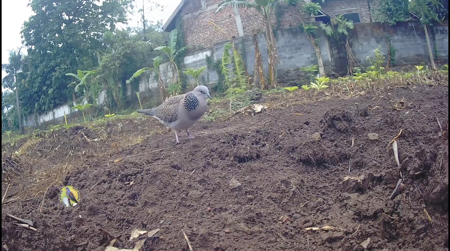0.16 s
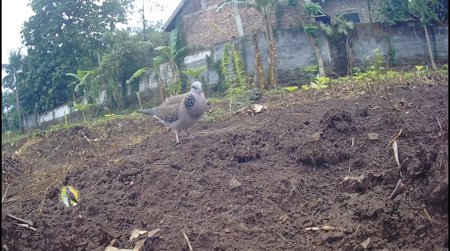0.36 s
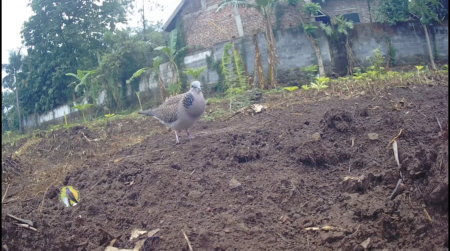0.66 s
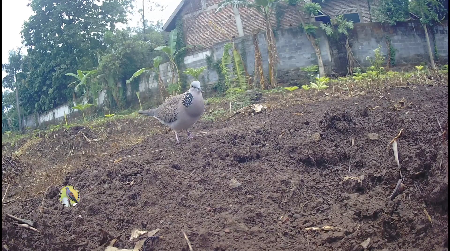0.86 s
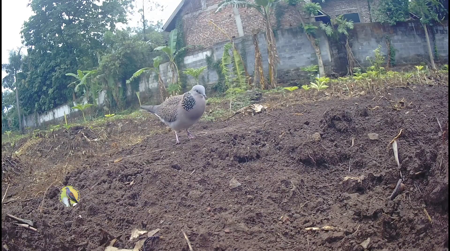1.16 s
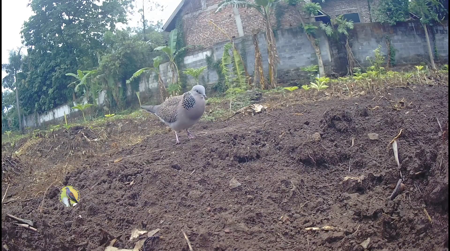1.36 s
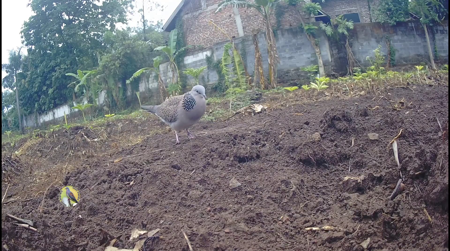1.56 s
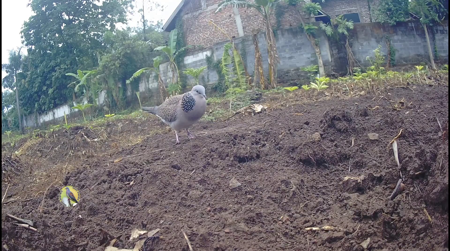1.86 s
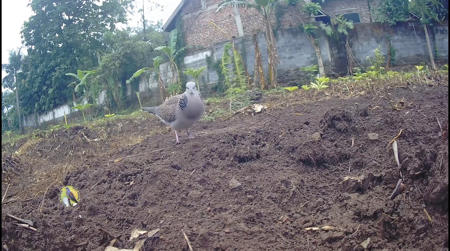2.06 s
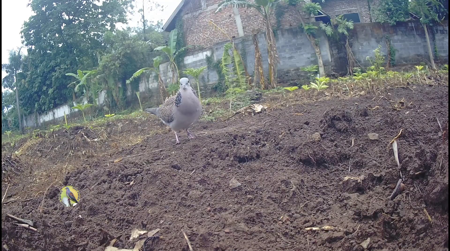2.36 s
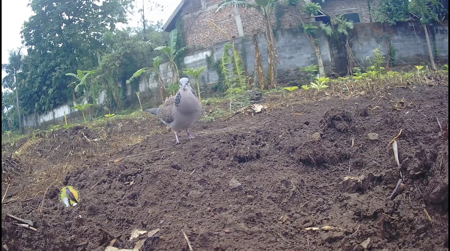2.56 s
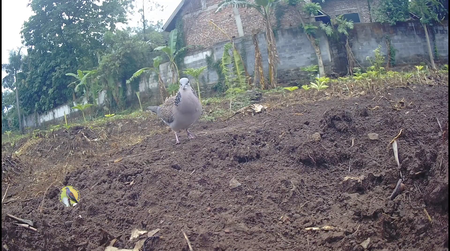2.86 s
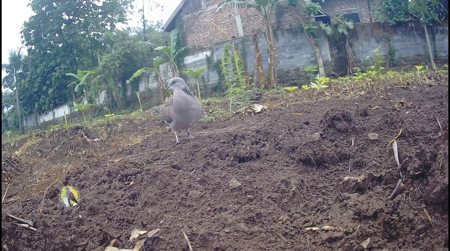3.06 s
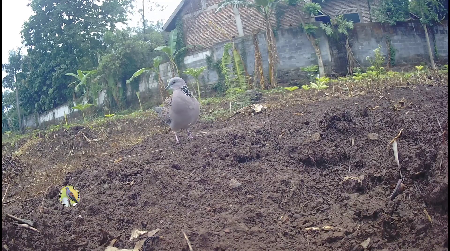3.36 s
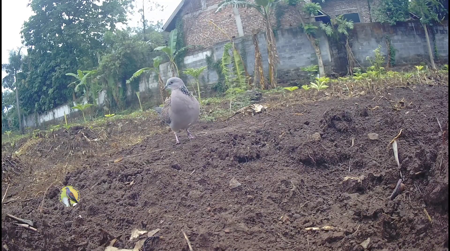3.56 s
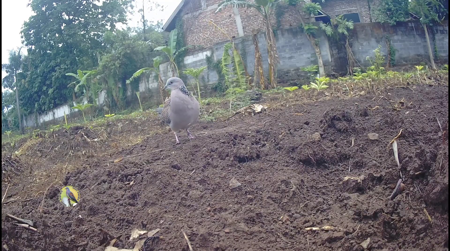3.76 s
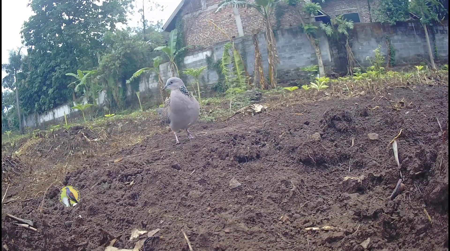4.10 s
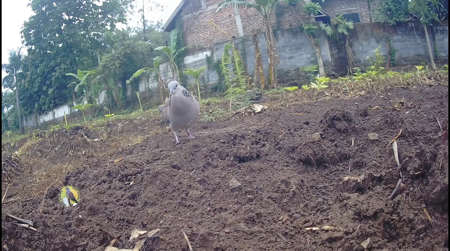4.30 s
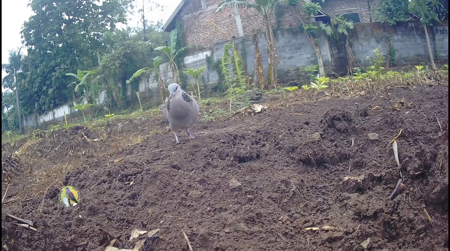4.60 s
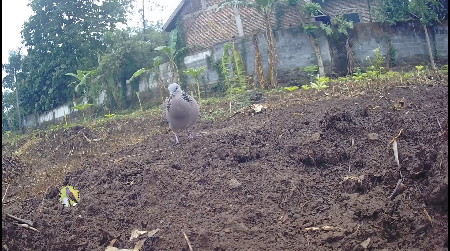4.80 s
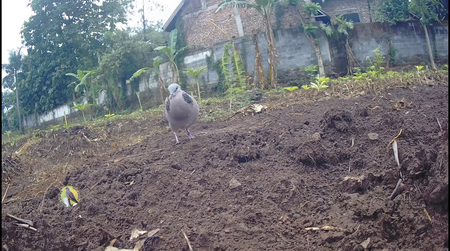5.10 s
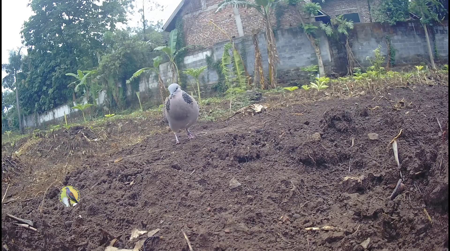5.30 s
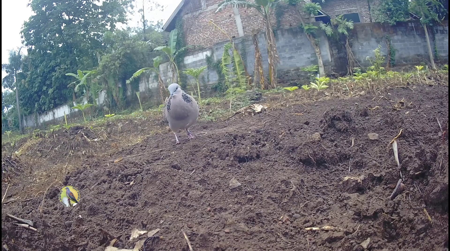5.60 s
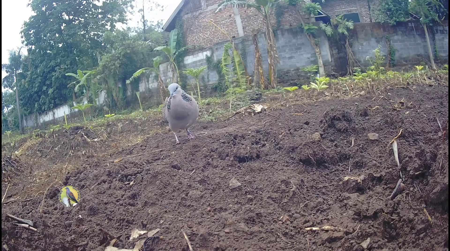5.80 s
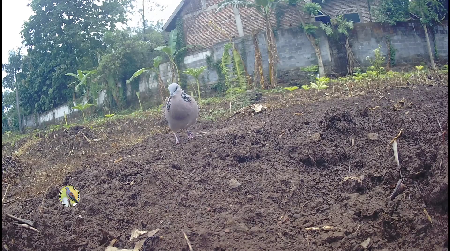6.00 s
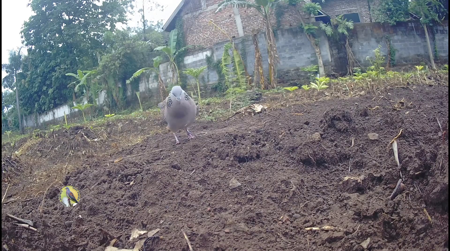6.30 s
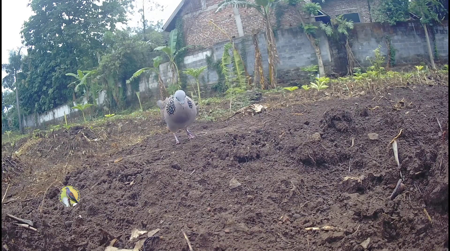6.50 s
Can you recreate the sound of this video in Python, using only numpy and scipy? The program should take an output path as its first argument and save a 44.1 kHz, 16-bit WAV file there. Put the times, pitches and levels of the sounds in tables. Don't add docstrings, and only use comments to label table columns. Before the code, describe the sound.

A dove close by coos in throaty, throbbing purrs, twice in full and once cut short, over low traffic and motor hum outdoors.

```python
import sys
import numpy as np
from scipy import signal
from scipy.fft import rfft, irfft
from scipy.io import wavfile
from scipy.ndimage import uniform_filter1d, minimum_filter1d

SR = 44100
rng = np.random.default_rng(int(sys.argv[2]) if len(sys.argv) > 2 else 0)


def put_to_file(sound):
    columns = np.atleast_2d(sound).T
    safe = np.clip(columns, -1, 1)
    whole_steps = np.round(safe * 32767)
    wavfile.write(sys.argv[1], SR, whole_steps.astype(np.int16))


def invert_db(level):
    return 10 ** (np.asarray(level, dtype=float) / 20)


N = 293265
T = np.arange(N) / SR

TIGHTEN_S = .0115
STRAY_PUFF_S, STRAY_PUFF_DB = .0043, -8.5
HUSH_DB = -90
# [t/s, top f/Hz, level/dB]
CROONS = [
    [(1.429, 635, -0.9), (1.453, 754.5, 1.2), (1.49, 830.5, 6.5), (1.55, 839.6, 7), (1.6, 781.7, 6),
     (1.65, 752.6, 3), (1.75, 680, 6.5), (1.866, 594.7, -1), (1.886, 539.5, -25)],
    [(4.736, 635, 0.7), (4.759, 772.6, 3.5), (4.8, 830.6, 5.5), (4.885, 836, 7.5), (4.91, 766, 6.5),
     (4.97, 789.5, 7.5), (5.05, 712, 6.5), (5.19, 568, -6.5), (5.21, 530, -15.5)],
]


def rms_one(x):
    return x / np.sqrt(np.mean(x ** 2) + 1e-20)


def at_hz(points, hz):
    table_hz, value = np.array(points).T[:2]
    return np.interp(np.log(hz), np.log(table_hz), value)


def one_pole(x, seconds):
    r = np.exp(-1 / (seconds * SR))
    return signal.lfilter([1 - r], [1, -r], x)


def soften(x, size):
    return uniform_filter1d(uniform_filter1d(x, size=size), size=size)


def drift(rate):
    r = np.exp(-80 * np.pi * rate / SR)
    noise = rng.standard_normal(N // 40 + 2002)
    slow = signal.lfilter([1], [1, -2 * r, r * r], noise)[2000:]
    return np.interp(np.arange(N) / 40, np.arange(len(slow)), rms_one(slow))


def resonance(x, hz, width_hz):
    r = np.exp(-np.pi * width_hz / SR)
    bottom = [1, -2 * r * np.cos(2 * np.pi * hz / SR), r * r]
    return signal.lfilter(np.array([1, 0, -1]) * (1 - r * r) / 2, bottom, x)


def ringing_noise(hz, width_hz):
    once = resonance(rng.standard_normal(N), hz, width_hz)
    return rms_one(resonance(once, hz, width_hz))


def tone_phase(hz):
    return 2 * np.pi * np.cumsum(hz) / SR


def placed(x, left_db):
    return x * invert_db(np.array([[left_db / 2], [-left_db / 2]]))


def short_notes():
    # [start t/s, held for/s, top f/Hz, sag after the top/(Hz/s), tail fall/(dB/s)]
    kuks = [
        (.986, .051, 725, 3600, 420),
        (4.252, .047, 700, 5000, 480),
        (6.316, .066, 718, 1500, 4000),
    ]
    # [first t/s, gap/s, level/dB, valve closure in the tail before/dB]
    mutters = [
        (1.0922, .0146, -8, 4),
        (4.3293, .0152, -11, 3),
        (6.4184, .0143, -7, 25),
    ]
    # [first full throb t/s, held from t/s, end t/s, level/dB]
    rolls = [
        (1.1732, 1.238, 1.288, 6.5),
        (4.458, 4.532, 4.586, 9.5),
        (6.4995, 6.5855, 6.638, 6.5),
    ]
    kuk_start_hz, kuk_top_s, kuk_swell_db, kuk_held_db = 523.7, .032, -4.5, 2
    mutter_hz, puff_fall_db, last_puff_db, tail_gap_s = 641, 109, 5, .0145
    roll_start_hz, roll_first_hz, roll_held_hz, roll_end_hz = 572.3, 654.5, 723, 620
    effort, beats = [], []
    for kuk, mutter, roll in zip(kuks, mutters, rolls):
        s, held, top, sag, tail = kuk
        puff, gap, puff_db, flutter_db = mutter
        full, hold, end, db = roll
        rise = top - kuk_start_hz
        low_db = puff_db - 5
        lead = full - .012
        faded = min(s + held + (kuk_held_db - low_db) / tail, puff)
        faded_hz = max(top - sag * (faded - s - kuk_top_s), 480)
        effort += [(s, top, HUSH_DB), (s, kuk_start_hz, -10.5),
                   (s + kuk_top_s / 3, top - .47 * rise, kuk_swell_db),
                   (s + .7 * kuk_top_s, top - .15 * rise, kuk_swell_db + 2.5),
                   (s + kuk_top_s, top, kuk_held_db - 2),
                   (s + held, top - sag * (held - kuk_top_s), kuk_held_db),
                   (faded, faded_hz, low_db)]
        effort += [(puff - gap / 2, 590, low_db), (puff, 600, low_db - 7.5),
                   (puff, mutter_hz, puff_db), (lead - 2 * gap, mutter_hz, puff_db - 8),
                   (lead - gap, mutter_hz, puff_db + last_puff_db),
                   (lead, mutter_hz, puff_db + last_puff_db)]
        effort += [(lead, roll_start_hz, -6), (full + TIGHTEN_S / 2, roll_first_hz, -2.7),
                   (hold, roll_held_hz, db), ((hold + end) / 2, roll_held_hz - 6, db),
                   (end - .008, roll_held_hz - 45, db), (end, roll_end_hz, db),
                   (end, roll_end_hz, db + STRAY_PUFF_DB),
                   (end + STRAY_PUFF_S, roll_end_hz, db + 2 * STRAY_PUFF_DB),
                   (end + STRAY_PUFF_S, roll_end_hz, HUSH_DB)]
        beats.append((s, 4, 0))
        for j, b in enumerate(np.arange(s + held, puff - gap / 2, tail_gap_s)):
            beats.append((b, min(flutter_db * (1 + 2 * j), 30), 0))
        beats += [(b, 30, puff_fall_db) for b in np.arange(puff, lead - gap / 2, gap)]
        beats.append((lead, 24, 0))
        throbs = round((hold - full) / .0125) + 1
        beats += [(b, 15.5, 0) for b in np.linspace(full, hold, throbs)]
        beats.append((end, 30, 0))
    return effort, beats


def long_notes():
    # [from t/s, number of throbs, closure/dB]
    first_beats = [(1.429, 1, 18), (1.4457, 3, 27), (1.5016, 1, 30), (1.5163, 5, 26), (1.5831, 3, 18),
                   (1.6273, 2, 9), (1.6514, 1, 4), (1.6906, 1, 9), (1.7164, 3, 19), (1.7662, 1, 16),
                   (1.789, 4, 11), (1.8569, 1, 11)]
    # [from t/s, number of throbs, closure/dB]
    second_beats = [(4.736, 1, 18), (4.7512, 3, 21), (4.8095, 4, 27), (4.8732, 2, 17), (4.9009, 3, 26),
                    (4.9359, 3, 26), (4.9768, 2, 30), (5.0017, 1, 6), (5.0263, 1, 9), (5.0632, 3, 14),
                    (5.1094, 1, 14), (5.1341, 3, 11), (5.1861, 1, 6)]
    effort, beats = [], []
    for curve, runs in zip(CROONS, (first_beats, second_beats)):
        s, hz, db = curve[0]
        last_s, last_hz = curve[-1][:2]
        effort += [(s - STRAY_PUFF_S, hz, HUSH_DB), (s - STRAY_PUFF_S, hz, db + 2 * STRAY_PUFF_DB),
                   (s, hz, db + STRAY_PUFF_DB), *curve, (last_s, last_hz, HUSH_DB)]
        ends = [run[0] for run in runs[1:]] + [last_s]
        for (start, throbs, closure_db), run_end in zip(runs, ends):
            for b in np.linspace(start, run_end, round(throbs), endpoint=False):
                fall_db = 7 * (b == runs[0][0])
                beats.append((b, closure_db, fall_db))
        beats.append((last_s, 30, 0))
    return effort, beats


def phrases():
    short_effort, short_beats = short_notes()
    long_effort, long_beats = long_notes()
    effort = sorted(short_effort + long_effort, key=lambda row: row[0])
    return effort, sorted([(0, 0, 0), *short_beats, *long_beats, (N / SR, 0, 0)])


def dove():
    # [multiple of the pitch, level/dB]
    overtone_levels = [
        (2, -55),
        (3, -59),
    ]
    open_s, puff_open_s, shut_s = .0038, .0025, .0026
    effort, beats = phrases()
    s, taut_hz, level_db = np.transpose(effort)
    taut, level_db = np.interp(T, s, taut_hz), np.interp(T, s, level_db)
    crooning = sum((T > c[0][0]) * (T < c[-1][0]) for c in CROONS)

    start, closure_db, fall_db = np.transpose(beats)
    k = np.searchsorted(start, T, side="right") - 1
    since, until = T - start[k], start[k + 1] - T
    is_puff = fall_db > 20
    opening_s = np.where(is_puff[k], puff_open_s, open_s)
    opening = 1 - (1 - invert_db(-closure_db[k])) * np.exp(-(since / opening_s) ** 2)
    closing = 1 - (1 - invert_db(-closure_db[k + 1])) * np.exp(-(until / shut_s) ** 2)

    dip_hz = np.maximum(taut - 577.4, np.where(crooning, 70.5, 111.46))
    shut = np.minimum(closure_db / 11.5, 1)
    tightening = np.clip(1 - since / TIGHTEN_S, 0, 1)
    easing = .53 * np.clip(since / TIGHTEN_S - 1, 0, 1) ** .5 * np.exp(-until / .005)
    slack = shut[k] * tightening + shut[k + 1] * easing
    scatter_hz = is_puff * rng.normal(0, 45, len(start))
    pitch = soften(np.minimum(taut - dip_hz * slack + scatter_hz[k], 830), size=70)

    unevenness_db = rng.normal(0, .4, len(start))
    crop_db = -3.3 * (np.maximum(pitch - 650, 0) / 100) ** 2
    dying_db = fall_db[k] * (since / (since + until)) ** 2
    flow_db = level_db + unevenness_db[k] + crop_db - dying_db
    flow = soften(invert_db(flow_db) * opening * closing, size=50)
    coo = invert_db(.9) * flow * np.sin(tone_phase(pitch))
    breath = invert_db(-29.5) * np.sqrt(flow) * rms_one(resonance(rng.standard_normal(N), 700, 600))

    top = -minimum_filter1d(-pitch, size=900)
    tension = top / 750
    buzz = soften(flow * invert_db(-crop_db), size=120) * invert_db(2.5 * drift(30.0) + 5 * crooning)
    buzz = buzz * (pitch / top) ** 8 * tension ** 2
    settled = tone_phase(soften(.1 * pitch + .9 * top - 8, size=500))
    overtones = buzz * sum(invert_db(db) * np.sin(m * settled) for m, db in overtone_levels)
    whistle = np.sin(tone_phase(5580 + 50 * drift(60.0)))
    beak = invert_db(-72) * crooning * buzz * tension ** 6 * whistle

    snap_level = soften(invert_db(-47 + level_db) * shut[k] * np.exp(-since / .002), size=40)
    snap = snap_level * ringing_noise(1300, 900)
    crop = signal.butter(4, 1050, fs=SR, output="sos")
    return signal.sosfiltfilt(crop, coo + breath) + overtones + beak + snap


def garden_echo(x, t60):
    t = np.arange(int(.2 * SR)) / SR
    tail = rng.standard_normal((2, len(t))) * invert_db(-60 * t / t60) * (t > .004)
    return signal.fftconvolve(x[None], tail / np.sqrt(np.sum(tail[0] ** 2)), axes=1)[:, :N]


def chick():
    # [start t/s, length/s, top f/Hz, end f/Hz, level/dB]
    peeps = [
        (.42, .1, 1645, 1580, -65),
        (1.92, .14, 1610, 1470, -63),
        (3.17, .135, 1610, 1430, -63),
        (5.27, .07, 1590, 1540, -77),
    ]
    out = np.zeros(N)
    for start, length, top_hz, end_hz, db in peeps:
        first = int(start * SR)
        u = np.arange(int(length * SR)) / (length * SR)
        sag_hz = (top_hz - end_hz) * u ** 1.6
        wobble_hz = 12 * np.sin(2 * np.pi * 45 * length * u)
        phase = tone_phase(top_hz - sag_hz - 130 * np.exp(-u / .039) + wobble_hz)
        tone = .8 * np.sin(2 * phase) + np.sin(3 * phase) + .2 * np.sin(4 * phase)
        flutter = invert_db(-.5 + 3 * drift(40.0)[first:][:len(u)])
        out[first:][:len(u)] += invert_db(db) * np.sqrt(np.sin(np.pi * u)) * tone * flutter
    return out


def crickets():
    # [start t/s, end t/s, level/dB]
    rasp_times = [
        (.79, 1.27, -72),
        (2.07, 2.55, -72),
        (3.3, 3.83, -72),
        (4.63, 5.1, -71),
        (5.82, 6.33, -72),
    ]
    phrase_level = 0
    for start, end, db in rasp_times:
        fade = np.minimum((T - start) / .065, (end - T) / .015)
        phrase_level = phrase_level + invert_db(db) * np.clip(fade, 0, 1)
    strokes = np.maximum(np.sin(tone_phase(80 + 6 * drift(4.4))) + .3, 0)
    wings = strokes * resonance(rng.standard_normal((2, N)), 7540, 260)
    rasp = phrase_level * rms_one(resonance(wings, 7540, 330))
    trill = invert_db(-70) * ringing_noise(3168, 70)
    return rasp + placed(trill, -1.6)


def camera_ticks():
    # [f/Hz, level/dB, time to fall by 60 dB/s]
    shell_rings = [
        (1780, -48, .014),
        (4850, -56, .008),
        (2400, -58, .005),
    ]
    per_s = 25
    at = np.arange(.012, N / SR, 1 / per_s)
    harder = np.arange(len(at)) % per_s == 7
    strength_db = rng.normal(0, 2.5, (len(at), 3)) + [9, 2, 0] * harder[:, None]
    out = np.zeros(N)
    for (hz, db, t60), each_db in zip(shell_rings, strength_db.T):
        clicks = np.zeros(N) + 1e-18
        clicks[(at * SR).astype(int)] = invert_db(db + each_db)
        r, w = invert_db(-60 / (t60 * SR)), 2 * np.pi * hz / SR
        out += signal.lfilter([0, np.sin(w)], [1, -2 * r * np.cos(w), r * r], clicks)
    return out


def motor(swell_db):
    # [f/Hz, level/dB, width/Hz, loud from t/s, loud to t/s]
    hum_lines = [
        (71.5, -37, 6.8, -3, 16),
        (163, -36.5, 8.9, 1, 3.18),
        (162.96, -34, 3.3, 3.5, 5.7),
        (204, -37.5, 1.8, 4, 7),
        (265.2, -32.5, 18, 1, 3.1),
        (282.1, -36, 2.9, 3, 3.4),
        (249.8, -37.5, 9, -8, 2.7),
        (424, -55.5, 12, 4, 8.3),
    ]
    out = 0
    for hz, db, width_hz, start, end in hum_lines:
        loud = np.clip(np.minimum(T - start, end - T) / .082 + 1, .25, 1)
        out = out + invert_db(db) * loud * ringing_noise(hz, width_hz)
    return invert_db(swell_db) * out


def air(swell_db):
    # [f/Hz, level per Hz/dB]
    air_levels = [(22, -28), (60, 2), (165, -2), (270, -9.5), (450, -10.5), (560, -16), (830, -17),
                  (1000, -26), (1240, -33.5), (2000, -35.5), (3140, -41), (3900, -46.5), (10000, -50),
                  (15000, -58.5)]
    # [f/Hz, likeness from -1 to 1]
    side_likeness = [(60, 1), (300, 1), (630, .97), (1000, .68), (1370, .58), (3010, .56), (6580, .11),
                     (14400, -.08)]
    # [f/Hz, difference/dB]
    left_lead = [(60, -3.0), (150, -3.5), (370, -2.5), (930, 0), (2320, -2), (5780, 0), (14400, -0.5)]
    out, edges = 0, 22 * 2 ** np.arange(0, 9.7, 1 / 3)
    white = rng.standard_normal((2, 2, N))
    for k, (low, high) in enumerate(zip(edges, edges[1:])):
        band = signal.butter(2, [low, high], "band", fs=SR, output="sos")
        mid, side = signal.sosfilt(band, white[k % 2])
        hz = np.sqrt(low * high)
        alike = np.clip(at_hz(side_likeness, hz), -1, 1)
        bass = 1 / (1 + (hz / 350) ** 2)
        gain = invert_db(at_hz(air_levels, hz) + bass * swell_db)
        pair = np.sqrt(1 + alike) * mid + np.sqrt(1 - alike) * side * [[1], [-1]]
        out = out + gain * placed(pair, at_hz(left_lead, hz))
    return invert_db(-27) * out / np.std(out[:, N // 3:N // 2])


def scene():
    # [t/s, traffic/dB, motor/dB]
    rumble = [
        (0.0, 5.5, -6.5),
        (6.65, 4, -1.5),
    ]
    s, traffic_points, motor_points = np.transpose(rumble)
    traffic_db, motor_db = np.interp(T, s, traffic_points), np.interp(T, s, motor_points)
    coo = dove()
    late_coo = np.interp(T - 1.5e-5, T, coo)
    bird = placed(np.array([late_coo, coo]), -1.7) + invert_db(-24) * garden_echo(coo, t60=.07)
    hum = air(traffic_db) + placed(motor(motor_db), -2.5)
    peeping = chick() * np.array([[.75], [1.2]])
    return bird + hum + crickets() + peeping + placed(camera_ticks(), -.5)


def top_dropouts(x, cut_db):
    # [lower edge f/Hz, margin to stay on]
    top_bands = [
        (11300, 2.6),
        (12700, 1.9),
        (13600, .9),
        (14300, -.2),
        (15100, 0),
    ]
    spectrum, hz, chance = rfft(x), np.arange(N // 2 + 1) * SR / N, drift(12.0)
    out = irfft(spectrum * (hz < top_bands[0][0]), N)
    for (low, margin), (high, _) in zip(top_bands, top_bands[1:]):
        on = margin + chance + .5 * drift(12.0) - .28 * cut_db > 0
        on = on[np.arange(N) // 1024 * 1024]
        out = out + soften(on * 1., size=300) * irfft(spectrum * (hz >= low) * (hz < high), N)
    return out


def low_pass(x):
    return signal.sosfilt(signal.butter(12, 15000, fs=SR, output="sos"), x)


def record(dry):
    ceiling_db, release_db_per_s = -7.1, 233
    dry = np.array([np.roll(dry[0], 1), dry[1]])
    loudness_db = 20 * np.log10(np.abs(dry.mean(axis=0)) + 1e-9)
    over = np.maximum(loudness_db - ceiling_db, 0)
    fall = release_db_per_s * T
    quick = np.maximum.accumulate(over + fall) - fall
    memory = .51 * one_pole(quick, .18)
    cut_db = one_pole(np.maximum(quick, memory), .0097)
    cut_db += 3.7 * np.exp(-T / .029)
    return low_pass(top_dropouts(dry * invert_db(-cut_db), cut_db))


dry = scene()
out = record(dry)
put_to_file(out)
```